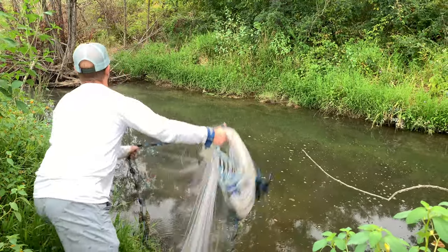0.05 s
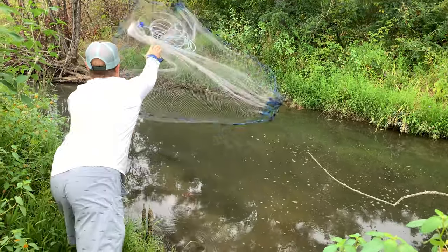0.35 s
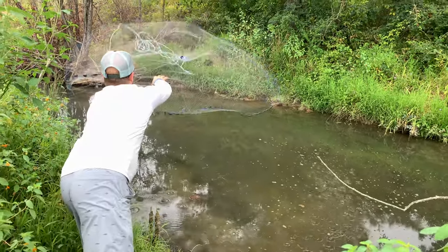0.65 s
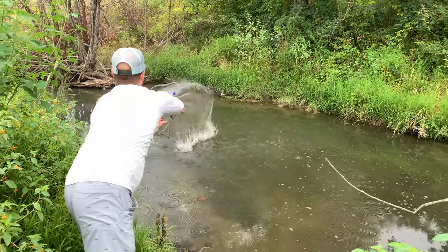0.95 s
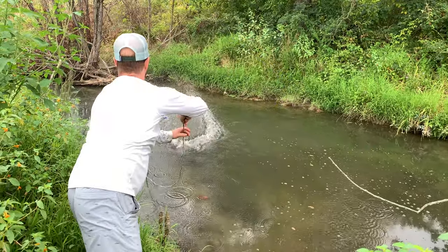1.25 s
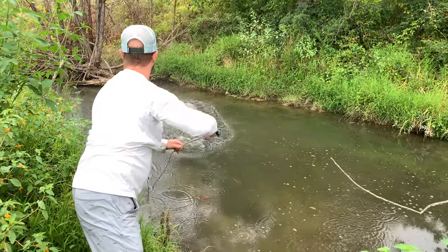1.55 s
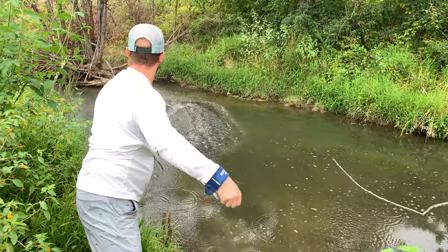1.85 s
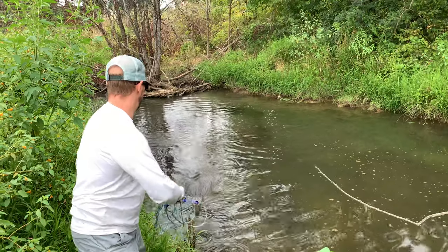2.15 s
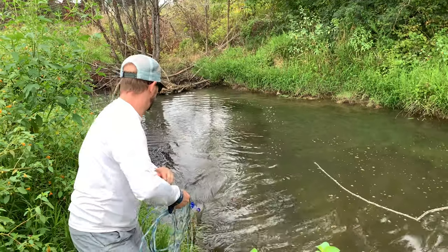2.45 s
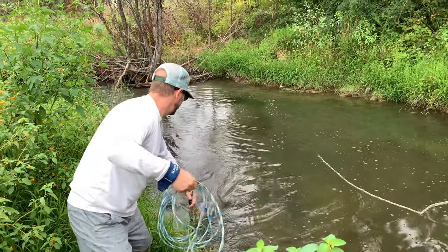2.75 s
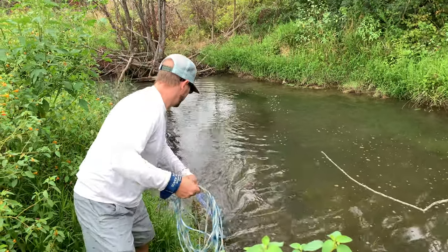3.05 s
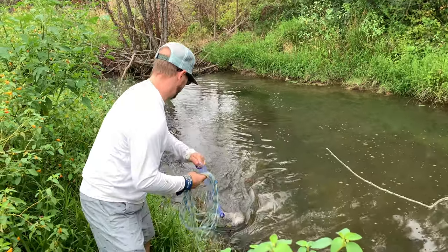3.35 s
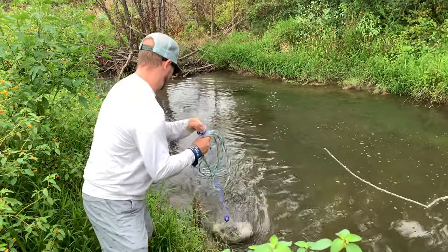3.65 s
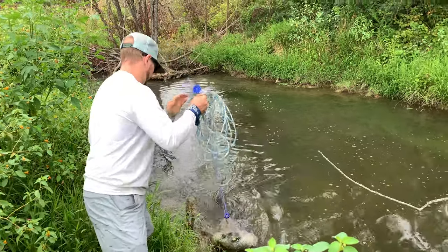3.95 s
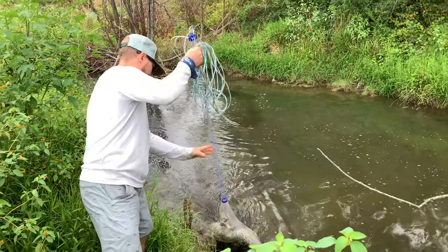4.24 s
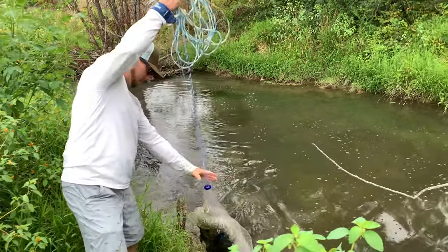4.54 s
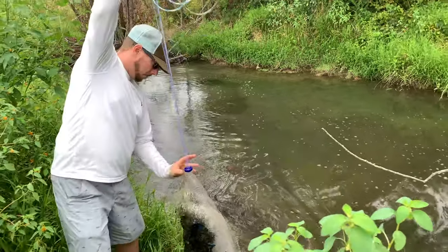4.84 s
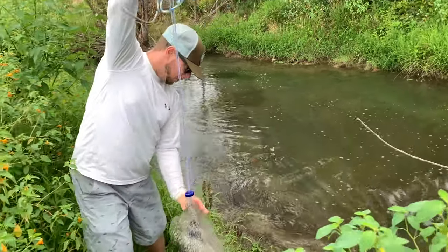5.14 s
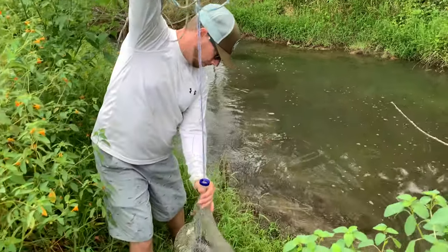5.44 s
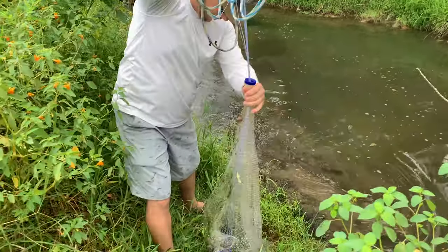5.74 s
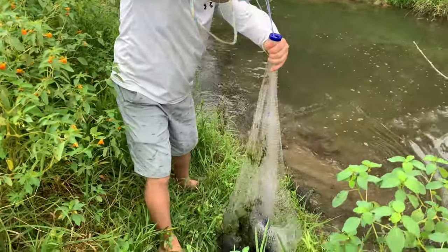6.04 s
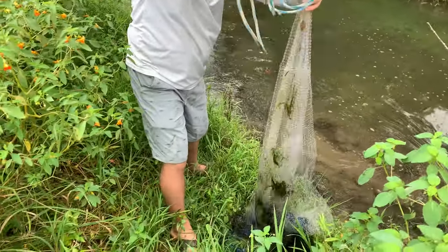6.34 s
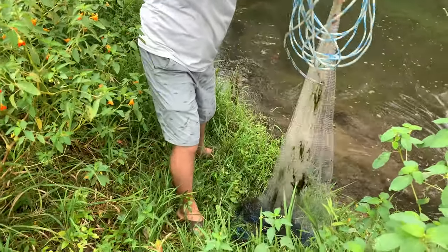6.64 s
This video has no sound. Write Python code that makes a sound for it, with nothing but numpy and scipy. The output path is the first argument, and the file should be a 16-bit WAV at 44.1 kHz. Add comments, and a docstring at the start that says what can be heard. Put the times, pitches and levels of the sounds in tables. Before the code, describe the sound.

A cast net swishes out and splashes into a creek, then drips as it is hauled in, with crickets trilling all around.

```python
"""A swish of mesh, then a splash: a cast net lands in a shallow creek. Its weights slap the surface,
air pockets gulp, foam fizzes out. The twisted line rasps through the fingers as it is coiled in.
The net is lifted, sloshing and dripping, and dragged onto the grassy bank. Water is ringing bubbles
plus noise; friction is crackle plus noise. Crickets trill all around over a low outdoor rumble."""
import sys
import numpy as np
from scipy import signal
from scipy.fft import rfft, irfft, next_fast_len
from scipy.io import wavfile

SR = 44100
rng = np.random.default_rng(int(sys.argv[2]) if len(sys.argv) > 2 else 0)


def master_out(mix):
    """Clip the mix to full scale and print it as 16-bit PCM to the path in sys.argv[1]."""
    frames = np.transpose(np.atleast_2d(mix))
    ceiling = np.clip(frames, -1, 1)
    pcm = np.round(ceiling * 32767).astype(np.int16)
    wavfile.write(sys.argv[1], SR, pcm)


N = 303849

# Stereo image of the water. Each row: frequency in Hz, left-right correlation.
WATER_CORRELATION = [(300, 1), (650, 0.98), (1200, 0.97), (2200, 0.55), (4500, 0.52), (10000, 0.2)]


def splash():
    """The weights tear the surface and plunge, leaving bursting foam under falling spray."""
    # Each row: frequency in Hz, relative level in dB.
    foam_spectrum = [(150, -21), (270, -9), (400, -8), (520, 3), (680, -1), (900, -3), (1140, 1),
                     (1500, -5), (2600, -10.5), (5000, -20.5), (9000, -35)]
    spray_spectrum = [(800, -5.5), (2500, 4.5), (4000, 1), (6000, -4), (9000, -2.5), (13000, -16),
                      (15700, -18)]
    # Each row: frequency in Hz, left channel's lead in radians.
    left_lead = [(900, -1), (2000, 0.83), (3500, 2.5), (6000, 3.5)]
    touch_s, land_s = 0.921, 0.96  # first weights, whole ring
    foam_gain = amp(-40) * envelope(land_s, rise_s=0.1, hold_s=0.47, t60_s=1.23, sag_db_per_s=5.5)
    spray_gain = amp(-44) * envelope(touch_s, rise_s=0.13, hold_s=0.51, t60_s=0.98, sag_db_per_s=15.5)
    swarm = bubbles(per_s=3000, low_hz=401, high_hz=5020, cycles=23, spread_db=8.5)
    foam = foam_gain * stereo(swarm + 1.2 * noise(), foam_spectrum, WATER_CORRELATION)
    droplets = crackle(per_s=2300, spread_db=5.5) + 0.5 * noise()
    spray = spray_gain * stereo(droplets, spray_spectrum, WATER_CORRELATION)
    balance = amp([[1.9], [-1.9]])
    return plunge() + balance * from_left(foam + spray + spatter(), left_lead)


def plunge():
    """Sinking weights churn the water; big air pockets close behind them and ring."""
    # Each row: peak time in seconds, level in dB.
    surges = [(1.064, -37), (1.115, -25.5), (1.146, -46), (1.205, -33.5)]
    # Each row: frequency in Hz, relative level in dB.
    spectrum = [(70, -29), (130, -20), (200, -6), (295, 1), (390, -8), (490, 0), (600, -0.5), (850, -13),
                (1130, -10), (1400, -17), (3000, -24), (5000, -60)]
    # Each row: start in seconds, level in dB, pitch in Hz.
    air_pockets = [(1.048, -28, 1086), (1.052, -35, 256), (1.076, -37, 697), (1.096, -34, 236),
                   (1.105, -26, 310), (1.118, -24.5, 574), (1.142, -45, 402), (1.183, -36, 490),
                   (1.196, -28.5, 580), (1.206, -33, 284), (1.244, -21.5, 462)]
    ring_cycles = 30.5
    gulps = [(s, db, hz, ring_cycles / hz) for s, db, hz in air_pockets]
    churn_gain = swells(surges, rise_db_per_s=417, fall_db_per_s=303)
    churn = churn_gain * stereo(noise(), spectrum, WATER_CORRELATION)
    return churn + plops(gulps, ring=1.6, burst=0.31, attack_share=0.065)


def spatter():
    """Clusters of weights slap the surface with a sudden, coarse crackle."""
    # Each row: start in seconds, level in dB.
    clusters = [(0.955, -47), (1.004, -46), (1.041, -37), (1.075, -41), (1.125, -41), (1.175, -47.5)]
    # Each row: frequency in Hz, relative level in dB.
    spectrum = [(300, -14), (800, -7), (1600, 0.5), (3000, 3.5), (5000, -1.5), (9000, -2), (13500, -6.5),
                (15700, -13)]
    hold_s = 0.0095
    gain = strokes([(s, hold_s, db) for s, db in clusters], rise_s=0.0074, t60_s=0.2)
    return gain * stereo(crackle(per_s=2500, spread_db=1) + 0.3 * noise(), spectrum, WATER_CORRELATION)


def runoff():
    """Water streams off the lifted mesh in bubbly spurts; drops fall from the spray, then the net."""
    # Each row: time in seconds, level in dB.
    flow = [(3.6, -71), (4.03, -67), (4.1, -59), (4.32, -54.5), (4.5, -47.5), (4.62, -55), (4.83, -53.5),
            (4.88, -64.5)]
    # Each row: frequency in Hz, relative level in dB.
    spectrum = [(300, -25), (700, -13), (960, -4), (1550, -4), (2300, -4.5), (3000, -4.5), (4000, 1),
                (5500, -4.5), (9000, -9)]
    # Each row: start in seconds, level in dB, pitch in Hz, T60 in seconds.
    fat_drops = [(1.297, -32, 1080, 0.038), (1.302, -32, 2700, 0.024), (1.317, -30, 3280, 0.011),
                 (1.331, -28, 1070, 0.022), (1.345, -34, 535, 0.053), (1.358, -28, 1080, 0.04),
                 (1.366, -35, 2120, .016), (1.386, -26.5, 530, 0.06), (1.398, -37, 1270, .025),
                 (1.433, -36, 1090, 0.027), (1.453, -30, 1100, .03), (1.462, -29, 498, 0.1),
                 (1.486, -33.5, 2450, 0.021), (1.587, -32, 2200, .018), (1.618, -41, 1120, .04),
                 (1.772, -39, 1140, 0.024), (3.728, -49, 1870, 0.019), (3.843, -40.5, 1410, 0.042),
                 (4.113, -42.5, 1310, 0.06), (4.147, -44, 940, .025), (4.199, -37, 3660, 0.018),
                 (4.225, -25.5, 4000, 0.0045), (4.257, -38, 740, 0.032), (4.2765, -37, 3600, 0.014),
                 (4.294, -30.5, 3400, 0.017), (4.407, -39, 1880, .035), (4.459, -42, 1600, 0.019),
                 (4.475, -38, 3230, 0.02), (4.489, -36, 3780, .02), (4.501, -33, 1457, 0.062),
                 (4.512, -36.5, 910, 0.037), (4.531, -27.5, 3040, 0.014), (4.551, -38, 2050, 0.035),
                 (4.588, -40, 1460, 0.027), (4.62, -43, 1370, .04), (4.648, -42, 960, 0.037),
                 (4.692, -47, 1520, .022), (4.755, -38.5, 3640, 0.014), (4.806, -42, 1140, 0.034),
                 (4.822, -40.5, 1910, 0.03)]
    start_s, end_s = flow[0][0], flow[-1][0]
    gain = amp(curve(flow)) * envelope(start_s, rise_s=0.022, hold_s=end_s - start_s, t60_s=0.34)
    swarm = bubbles(per_s=1200, low_hz=750, high_hz=3300, cycles=20, spread_db=7)
    spurts = amp(1.3 * wobble(25))
    stream = gain * spurts * stereo(swarm + 1.75 * noise(), spectrum, WATER_CORRELATION)
    return stream + plops(list(fat_drops) + drips(flow), ring=0.75, burst=0.29, attack_share=0.044)


def drips(flow, count=12, low_hz=890, high_hz=2290, cycles=33, over_flow_db=8):
    """Small random drips, louder when more water runs; returns rows for plops()."""
    times_s, flow_db = np.transpose(flow)
    jitter, pitch = rng.random((count, 2)).T
    start_s = times_s[0] + (times_s[-1] - times_s[0]) * (np.arange(count) + jitter) / count
    hz = low_hz * (high_hz / low_hz) ** pitch
    return list(zip(start_s, np.interp(start_s, times_s, flow_db) + over_flow_db, hz, cycles / hz))


def mesh_slide(spectrum):
    """Fine mesh and wet line hiss as they slide; single knots snag and let go."""
    # Each row: start in seconds, hold in seconds, level in dB.
    slides = [(-0.05, 0.71, -54), (0.09, 0.23, -50.5), (0.77, 0.22, -55.5), (0.98, 0.14, -45.5),
              (1.22, 0.38, -55.5), (1.82, .01, -58), (1.95, 0.06, -46), (2.1, 0.33, -54),
              (2.34, 0.1, -49.5), (2.42, .01, -54), (2.6, 0.53, -64), (3.2, 0.25, -68), (4.02, .3, -62),
              (4.31, .06, -54), (4.39, 0.11, -50.5), (4.55, 1.18, -55), (5.89, 0.8, -54.5)]
    rest_db = -61  # the net never lies quite still
    gain = np.hypot(strokes(slides, rise_s=0.034, t60_s=0.35), amp(rest_db))
    # Each row: frequency in Hz, left-right correlation.
    correlation = [(400, .7), (1200, 0.5), (2500, -0.37), (7000, 0.52)]
    stick_slip = amp(1.6 * wobble(45) + 0.96 * wobble(10))
    contacts = crackle(per_s=5000, spread_db=5.5)
    snags = 0.17 * crackle(per_s=400, spread_db=-1)
    return gain * stick_slip * stereo(contacts + snags + 1.4 * noise(), spectrum, correlation)


def clothes_brush():
    """Net and line brush the clothes of the thrower, who stands to the left."""
    # Each row: start in seconds, hold in seconds, level in dB.
    brushes = [(-0.05, 0.88, -58.5), (0.09, 0.18, -55.5), (1.945, 0.059, -50.5), (2.14, 0.31, -56.5)]
    # Each row: frequency in Hz, relative level in dB.
    spectrum = [(200, -7), (500, -1), (1000, 2.5), (2000, -0.5), (3000, 1), (4200, 3), (6000, -2),
                (9000, -17)]
    # Each row: frequency in Hz, left channel's lead in radians.
    left_lead = [(1400, 0.5), (2100, 1.57), (2900, 2.0), (4700, 2.5)]
    rustle = stereo(crackle(per_s=1800, spread_db=2) + 1.03 * noise(), spectrum, [(2500, 0.69)])
    return strokes(brushes, rise_s=0.041, t60_s=0.48) * from_left(rustle, left_lead)


def grass_drag():
    """Tugs drag the wet net through the grass of the bank."""
    # Each row: peak time in seconds, level in dB.
    tugs = [(5.02, -61.5), (5.32, -57.5), (5.66, -61.5), (6.2, -59.5), (6.58, -58.5)]
    # Each row: frequency in Hz, relative level in dB.
    spectrum = [(300, -21), (900, -6), (1800, 2), (3600, 6.5), (5000, 5), (7000, -18), (10000, -21)]
    rustle = stereo(crackle(per_s=2200, spread_db=-4.5) + 1.35 * noise(), spectrum, [(3000, 0.7)])
    return swells(tugs, rise_db_per_s=26, fall_db_per_s=66) * rustle


def weight_knocks(t60_s=0.096):
    """The weights knock softly against each other and the bank."""
    # Each row: start in seconds, level in dB, pitch in Hz.
    knocks = [(0.232, -50, 1370), (0.48, -55.5, 1260), (2.273, -51.5, 1190), (2.44, -52.5, 1000),
              (5.655, -54, 570), (6.58, -54, 1910), (6.649, -50, 3800)]
    return plops([(s, db, hz, t60_s) for s, db, hz in knocks], ring=0, burst=0.92, attack_share=0.01)


def hand_line(spectrum):
    """The line flicks through the hands and rasps once per twist; weights and line tick."""
    # Each row: start in seconds, level in dB.
    flicks = [(1.788, -46), (1.965, -46), (2.011, -42), (3.153, -45.5), (3.617, -51.5), (3.769, -53),
              (3.957, -44.5), (4.671, -44)]
    ticks = [(0.9855, -25), (1.006, -32), (1.0545, -35), (2.013, -36), (4.226, -37.5), (5.795, -39),
             (5.829, -37.5)]
    # Each row: start in seconds, hold in seconds, level in dB.
    pulls = [(2.69, .3, -58.5)]
    flick_rise_s, flick_t60_s, tick_t60_s, twists_per_s = 0.0012, 0.21, 0.012, 53.6
    contact_gain, t = np.zeros(N), np.arange(SR // 4) / SR
    for s, db in flicks:
        add(contact_gain, s, amp(db - 60 * t / flick_t60_s) * (1 - np.exp(-t / flick_rise_s)))
    for s, db in ticks:
        add(contact_gain, s, amp(db - 60 * t / tick_t60_s))
    twists = twists_per_s * np.arange(N) / SR + 0.16 * wobble(14)
    ridges = unit((0.3 + np.sin(np.pi * twists) ** 2) * amp(2 * wobble(30)))
    rasp_gain = strokes(pulls, rise_s=0.034, t60_s=0.12) * ridges
    friction = stereo(noise() + 0.23 * crackle(per_s=3900, spread_db=0), spectrum, [(8000, 0.27)])
    return np.hypot(contact_gain, rasp_gain) * friction


def net():
    """Handling of the net; mesh and line share one bright friction spectrum."""
    # Each row: frequency in Hz, relative level in dB.
    spectrum = [(500, -60), (2000, -17.5), (4000, -7), (5200, -14), (7000, -1.5), (8100, 8), (10500, 3.5),
                (13400, 9), (14800, 6), (15700, -5)]
    return mesh_slide(spectrum) + clothes_brush() + grass_drag() + weight_knocks() + hand_line(spectrum)


def crickets(count=4):
    """Near crickets trill with their wings, each at its own pitch, over a blurred far chorus."""
    # Each row: frequency in Hz, relative level in dB.
    chorus_spectrum = [(4000, -70), (4900, -71), (5400, -6.5), (5800, -1), (6100, 5), (6450, 4),
                       (6800, -1.5), (7200, -49), (9000, -60)]
    t, near = np.arange(N) / SR, np.zeros((2, N))
    for place in np.linspace(0, 1, count):
        strokes_per_s = 25 + 45 * rng.random()
        stroke = strokes_per_s * t + 0.8 * wobble(12)
        hz = 6170 + 380 * (place - 0.5) + 90 * wobble(70) - 260 * (stroke % 1 - 0.5)  # each stroke slows
        phase = 2 * np.pi * (np.cumsum(hz) / SR + np.array([[0], [1.4 * place]]))
        pulses = np.abs(np.sin(np.pi * stroke)) * amp(4.5 * np.tanh(wobble(28)))
        near += pulses * np.sin(phase)
    far = stereo(noise(), chorus_spectrum, [(6000, -0.089)])
    return (amp(-57) * unit(near) + amp(-54) * far) * amp(1.2 * wobble(28))


def outdoors():
    """Two bands of wavering rumble, a deep drone, a late fuzzy hum and the creek's soft wash."""
    # Each row: frequency in Hz, relative level in dB.
    deep_spectrum = [(12, -10), (22, -7), (36, -5.5), (50, 1), (65, -3.5), (85, -6.5), (120, -17),
                     (200, -44), (500, -120)]
    upper_spectrum = [(25, -54), (60, -7), (95, 3.5), (130, 2), (170, -5.5), (230, -15), (330, -31.5),
                      (1500, -120)]
    drone_spectrum = [(25, -120), (38, -18), (44, -17.5), (47.5, 3.5), (51, -6.5), (58, -17), (90, -120)]
    hum_spectrum = [(110, -40), (180, 0), (235, -1), (285, -11), (400, -44), (800, -90)]
    creek_spectrum = [(100, -17), (300, 3.5), (600, 3), (1000, 1), (1600, -3.5), (2600, -13), (3800, -8),
                      (5000, -13.5), (8000, -14.5), (15000, -17.5)]
    # Each row: frequency in Hz, left-right correlation.
    correlation = [(120, 0.99), (300, 0.99), (700, 0.081), (3000, 0.057), (12000, 0.056)]
    # Each row: time in seconds, level in dB.
    upper_level = [(0, -53), (0.5, -54), (1.7, -51), (2.3, -57), (3.1, -54), (3.9, -49.5), (4.9, -58.5),
                   (6.5, -49.5)]
    # Each row: peak time in seconds, level in dB.
    deep_swells = [(0.15, -36.5), (0.66, -41), (1.66, -40), (2.21, -40), (2.37, -41.5), (6.0, -46)]
    upper_swells = [(0.13, -53.5), (0.52, -51), (1.7, -52), (3.8, -49.5), (5.05, -52.5), (6.3, -58),
                    (6.55, -50)]
    deep_gain = np.hypot(amp(-47 + 0.5 * wobble(3.5)), swells(deep_swells, 152, 152))
    upper_gain = np.hypot(amp(curve(upper_level)), swells(upper_swells, 100, 100))
    deep = deep_gain * stereo(noise(), deep_spectrum, correlation)
    upper = upper_gain * stereo(noise(), upper_spectrum, [(100, 0.96)])
    drone = amp(-50.5) * stereo(noise(), drone_spectrum, correlation)
    hum_start_s, hum_rise_s = 5.37, 1.66
    hum_gain = amp(-58) * curve([(hum_start_s, 0), (hum_start_s + hum_rise_s, 1)])
    hum = hum_gain * stereo(noise(), hum_spectrum, correlation)
    creek = amp(-62) * stereo(noise(), creek_spectrum, correlation) * amp(0.58 * wobble(4.3))
    return deep + upper + drone + hum + creek


def bank_echo(x, low_cut_hz=500):
    """The overgrown banks scatter a short echo; foliage returns little bass."""
    # Each row: frequency in Hz, T60 in seconds.
    decay = [(200, 0.047), (2000, 0.17), (12000, 0.058)]
    hz, t, bins = signal.stft(rng.standard_normal((2, SR // 2)), SR, nperseg=256)
    tail = signal.istft(bins * amp(-60 * t / along(decay, hz)[:, None]), SR, nperseg=256)[1]
    echo = signal.fftconvolve(x, tail / np.linalg.norm(tail[0]), axes=1)[:, :N]
    return filtered(echo, lambda hz: hz / (hz + low_cut_hz))


def bubble(t, hz, t60_s, glide):
    """A bubble rings, dies and climbs in pitch as it nears the surface."""
    phase = 2 * np.pi * hz * t * (1 + glide * t / t60_s)
    return np.sin(phase) * amp(-60 * t / t60_s) * (1 - np.exp(-2 * hz * t))


def bubbles(per_s, low_hz, high_hz, cycles, spread_db, loop_s=2):
    """Two looped swarms of bubbles; small ones ring higher and shorter."""
    t, span = np.arange(600) / SR, loop_s * SR
    when, pitch, strength, life = rng.random((int(per_s * loop_s), 4)).T[..., None]
    hz = low_hz * (high_hz / low_hz) ** pitch
    gain = hz * amp(spread_db * strength ** 3) * (1 - t / t[-1])
    rings = gain * bubble(t, hz, cycles * (0.5 + life) / hz, glide=0.26)
    index = (when * 2 * span).astype(int) + np.arange(len(t))
    swarms = np.bincount(index.ravel(), rings.ravel(), 2 * span)[:2 * span].reshape(2, span)
    return unit(swarms)[:, np.arange(N) % span]


def plops(rows, ring, burst, attack_share):
    """Each contact is a noise burst; in water a trapped bubble rings with it."""
    track, t = np.zeros(N), np.arange(SR // 6) / SR
    for s, db, hz, t60_s in rows:
        band = signal.butter(2, [hz / 2, min(hz * 1.52, SR / 2.2)], "band", fs=SR)
        slap = unit(signal.lfilter(*band, rng.standard_normal(len(t)))) * amp(-60 * t / t60_s)
        onset = 1 - np.exp(-(t / (attack_share * t60_s)) ** 2)
        add(track, s, amp(db) * onset * (ring * bubble(t, hz, t60_s, glide=0.1) + burst * slap))
    return track


def crackle(per_s, spread_db):
    """Two streams of tiny random contacts of uneven size."""
    return unit(noise() * (rng.random((2, N)) < per_s / SR) * amp(spread_db * np.clip(noise(), -2, 2)))


def noise():
    """Two independent white noises."""
    return rng.standard_normal((2, N))


def wobble(knots_per_s):
    """Smooth random curve."""
    fine = signal.resample_poly(rng.standard_normal(int(N * knots_per_s / SR) + 4), 8, 1)
    return np.interp(np.arange(N) * (8 * knots_per_s / SR), np.arange(len(fine)), fine)


def envelope(start_s, rise_s, hold_s, t60_s, sag_db_per_s=0):
    """Smooth rise, sagging hold, exponential release."""
    t = np.arange(N) / SR - start_s
    attack = np.sin(np.pi / 2 * np.clip(t / rise_s, 0, 1)) ** 2
    sag_db = sag_db_per_s * np.clip(t - rise_s, 0, hold_s)
    release_db = 60 * np.maximum(t - rise_s - hold_s, 0) / t60_s
    return attack * amp(-sag_db - release_db)


def strokes(rows, rise_s, t60_s):
    """Gain of held movements, summed in power."""
    return np.sqrt(sum((amp(db) * envelope(s, rise_s, hold_s, t60_s)) ** 2 for s, hold_s, db in rows))


def swells(rows, rise_db_per_s, fall_db_per_s):
    """Gain of peaked swells, summed in power."""
    t = np.arange(N) / SR
    gains = (amp(db - np.maximum(rise_db_per_s * (s - t), fall_db_per_s * (t - s))) for s, db in rows)
    return np.sqrt(sum(gain ** 2 for gain in gains))


def stereo(pair, spectrum, correlation):
    """Two independent signals become a coloured, partly correlated pair of rms 1."""
    angle = lambda hz: np.arccos(np.clip(along(correlation, hz), -1, 1)) / 2
    response = lambda hz: amp(along(spectrum, hz)) * [np.cos(angle(hz)), np.sin(angle(hz))]
    mid, side = filtered(pair, response)
    return unit(np.array([mid + side, mid - side]))


def from_left(x, lead):
    """A source on the left reaches the left microphone port first."""
    return filtered(x, lambda hz: np.exp(0.5j * np.outer([1, -1], along(lead, hz))))


def filtered(x, response):
    """Apply a frequency response."""
    size = next_fast_len(N + SR // 2)
    return irfft(rfft(x, size) * response(np.fft.rfftfreq(size, 1 / SR)), size)[..., :N]


def along(points, hz):
    """Interpolate (Hz, value) points on a log axis."""
    knots_hz, values = np.transpose(points)
    return np.interp(np.log(hz + 1), np.log(knots_hz + 1), values)


def curve(rows):
    """Interpolate (seconds, value) rows per sample."""
    return np.interp(np.arange(N) / SR, *np.transpose(rows))


def add(track, start_s, sound):
    """Mix a sound into a track."""
    part = track[..., max(round(start_s * SR), 0):][..., :sound.shape[-1]]
    part += sound[..., :part.shape[-1]]


def amp(db):
    """Decibels to gain."""
    return 10 ** (np.asarray(db) / 20)


def unit(x):
    """Scale to rms 1."""
    return x / np.sqrt(np.mean(x ** 2) + 1e-20)


def scene():
    """Water between the banks, the net close by, insects all around."""
    water = splash() + runoff()
    return water + amp(-9) * bank_echo(water) + net() + crickets() + outdoors()


def record(dry):
    """The band-limited microphone shares its high treble between channels, the right slightly early."""
    # Each row: frequency in Hz, gain of the left signal in the right channel (0-1).
    shared_treble = [(6700, 0.05), (7300, 0.32), (8800, 0.6), (11000, 1)]
    lead_s, in_phase_hz, top_hz = 0.000238, 13500, 15800
    share = lambda hz: np.clip(along(shared_treble, hz), 0, 1)
    lead = lambda hz: np.exp(2j * np.pi * (hz - in_phase_hz) * lead_s)
    left, right = dry
    shared = filtered(left, lambda hz: share(hz) * lead(hz))
    own = filtered(right, lambda hz: np.sqrt(1 - share(hz) ** 2))
    return filtered(np.array([left, shared + own]), lambda hz: hz < top_hz)


dry = scene()
out = record(dry)
master_out(out)
```